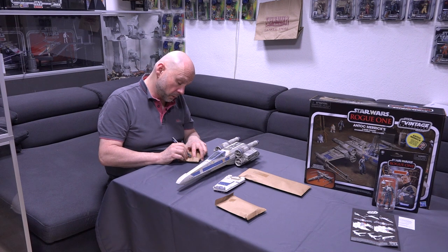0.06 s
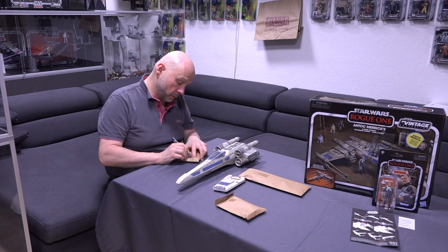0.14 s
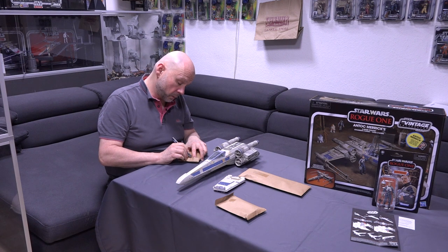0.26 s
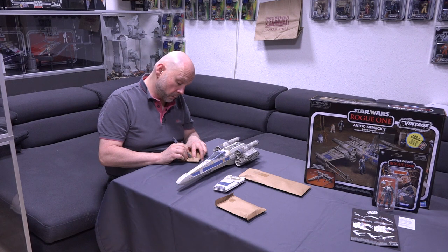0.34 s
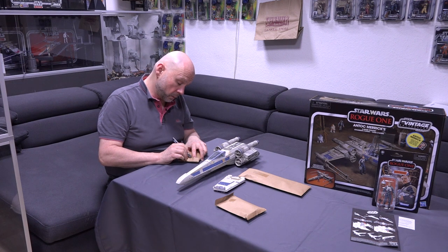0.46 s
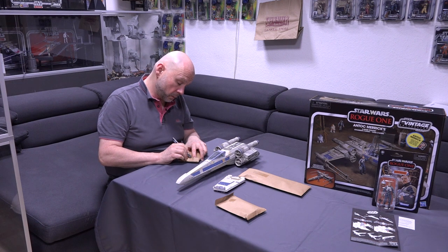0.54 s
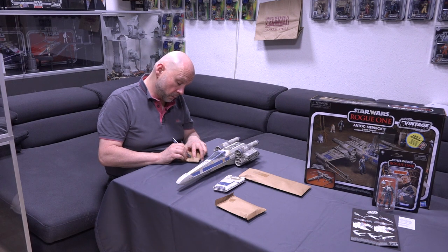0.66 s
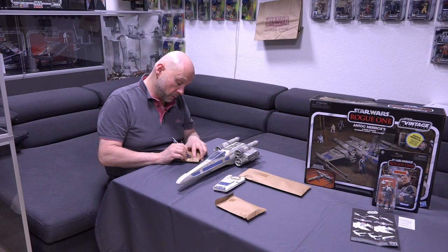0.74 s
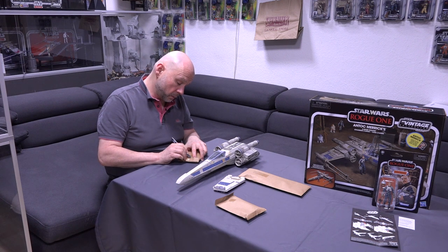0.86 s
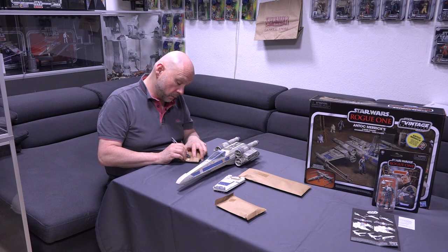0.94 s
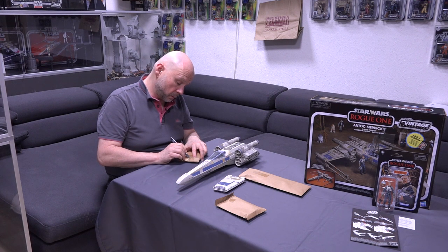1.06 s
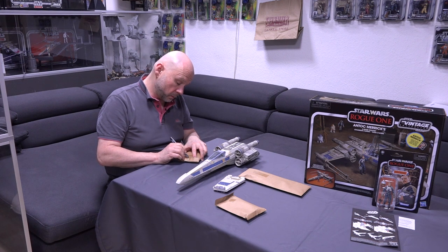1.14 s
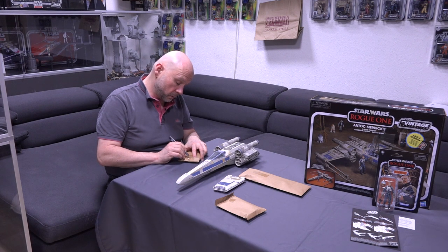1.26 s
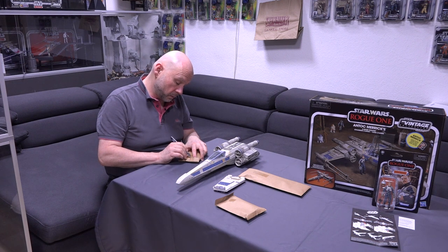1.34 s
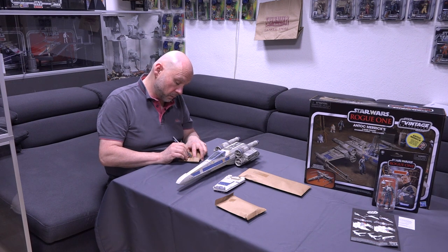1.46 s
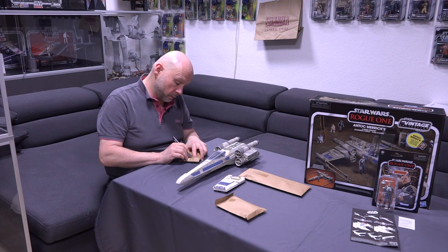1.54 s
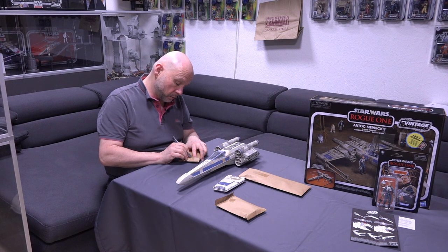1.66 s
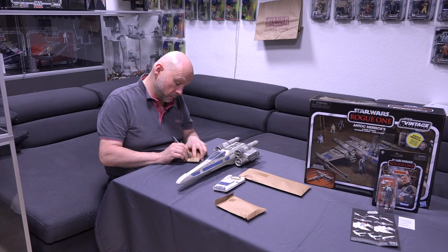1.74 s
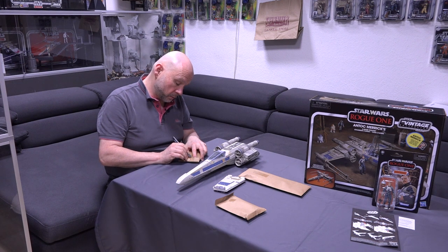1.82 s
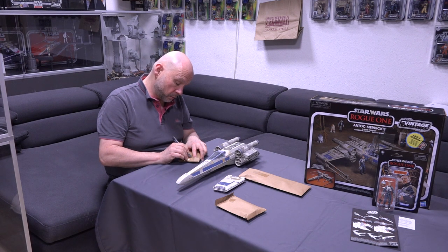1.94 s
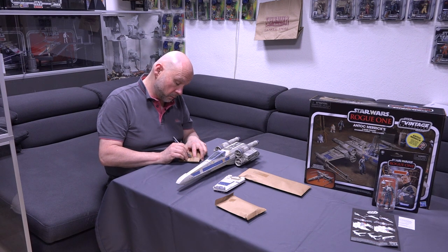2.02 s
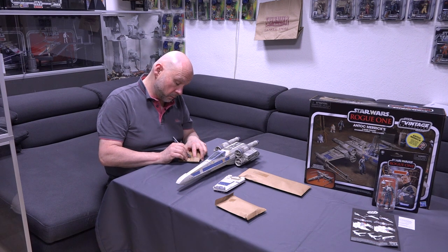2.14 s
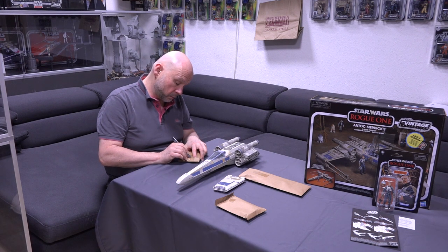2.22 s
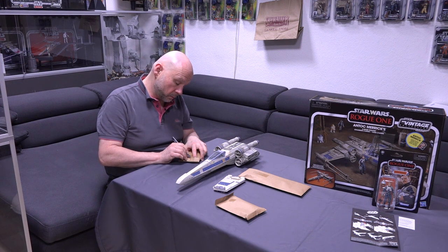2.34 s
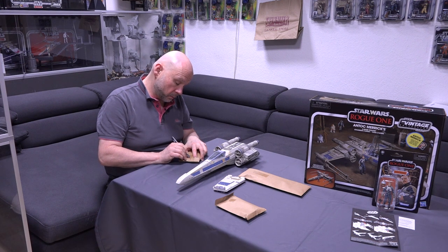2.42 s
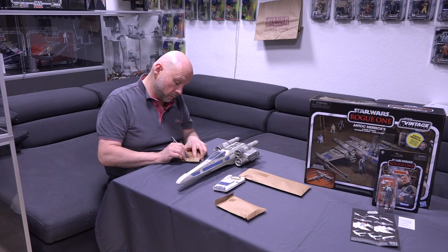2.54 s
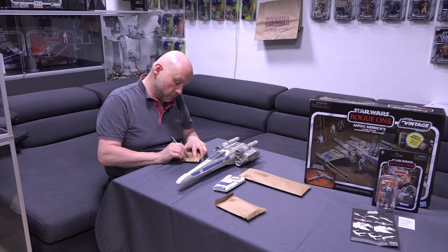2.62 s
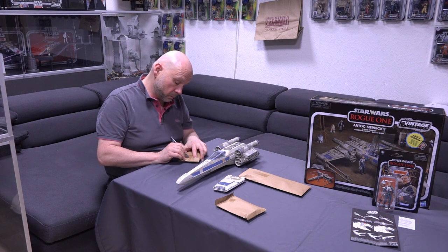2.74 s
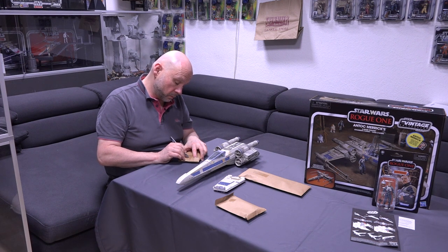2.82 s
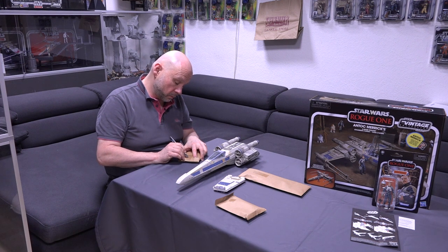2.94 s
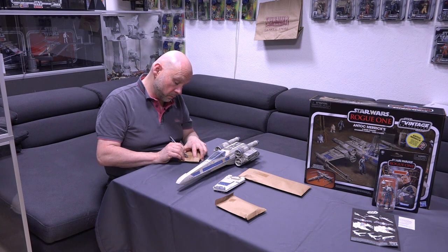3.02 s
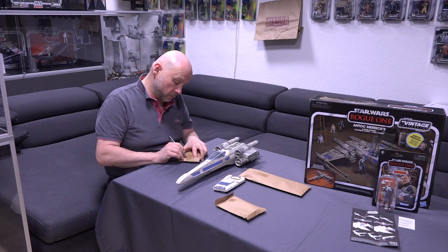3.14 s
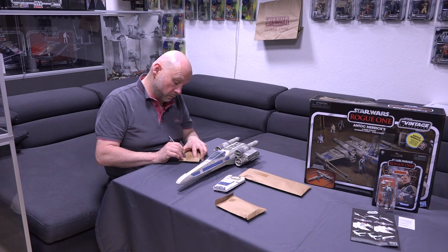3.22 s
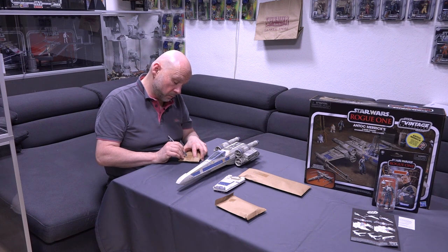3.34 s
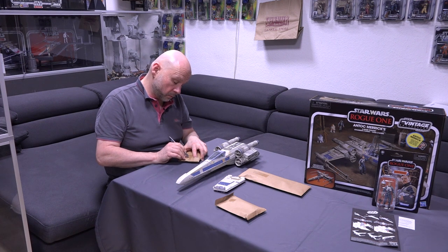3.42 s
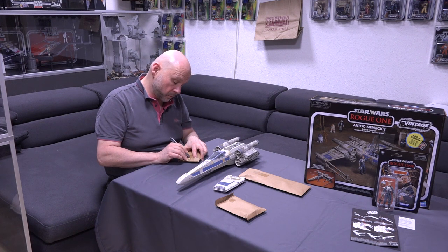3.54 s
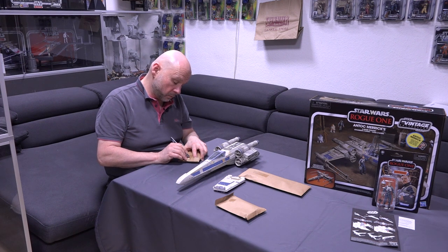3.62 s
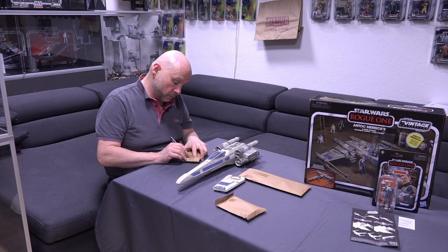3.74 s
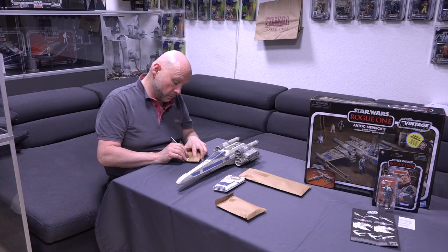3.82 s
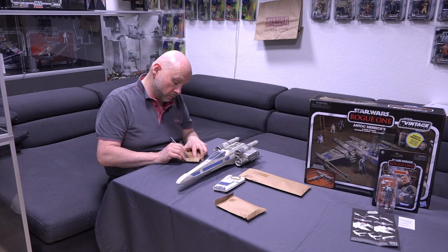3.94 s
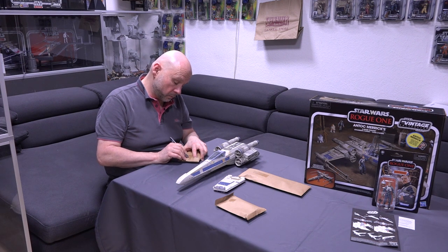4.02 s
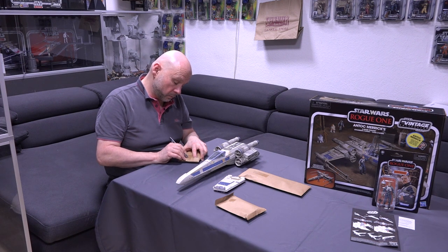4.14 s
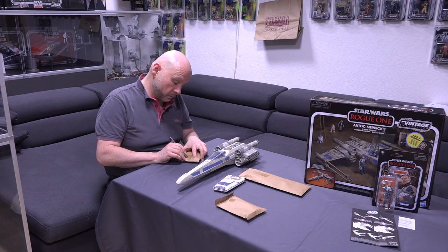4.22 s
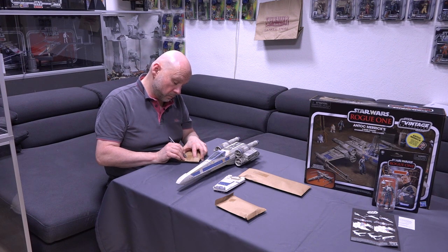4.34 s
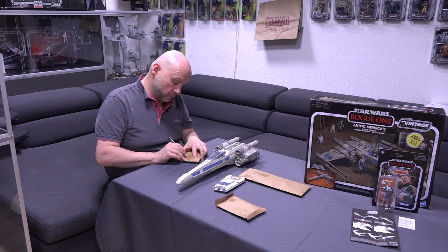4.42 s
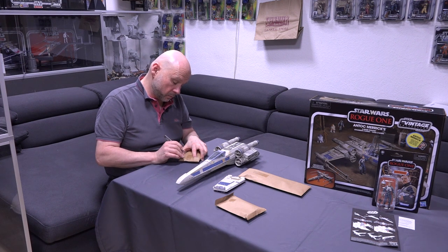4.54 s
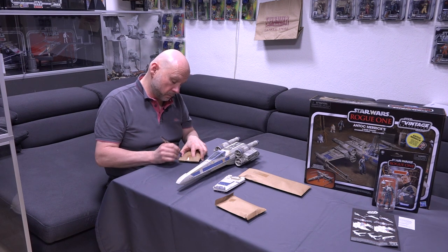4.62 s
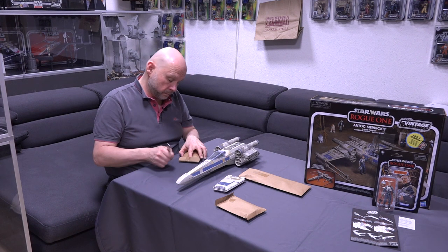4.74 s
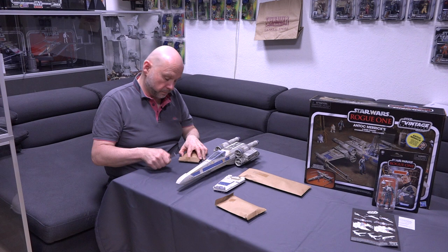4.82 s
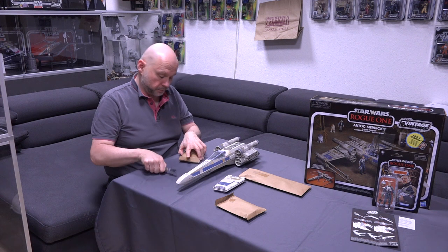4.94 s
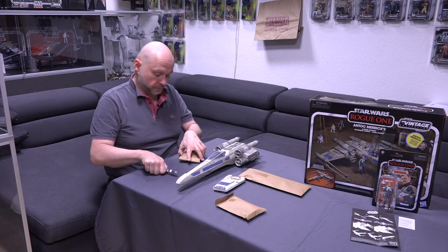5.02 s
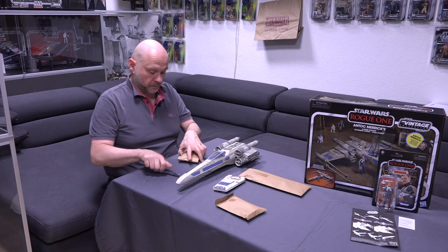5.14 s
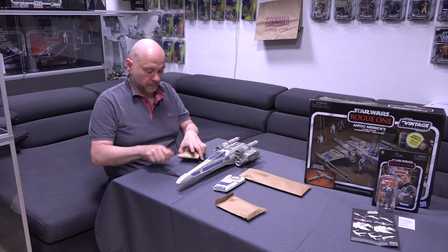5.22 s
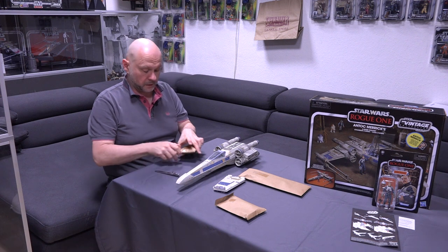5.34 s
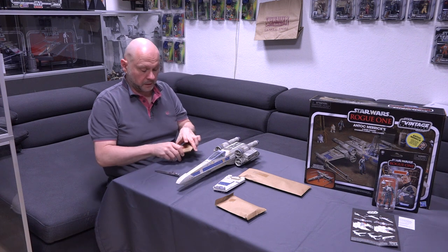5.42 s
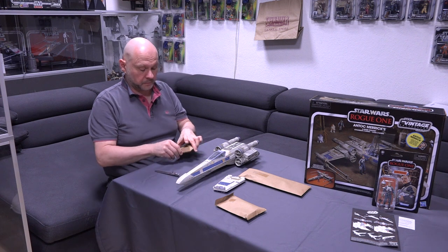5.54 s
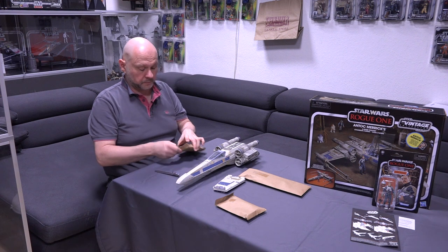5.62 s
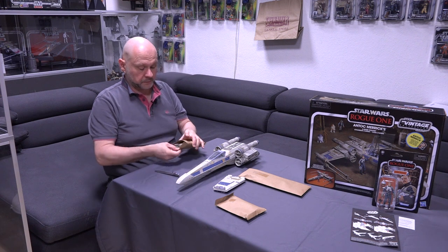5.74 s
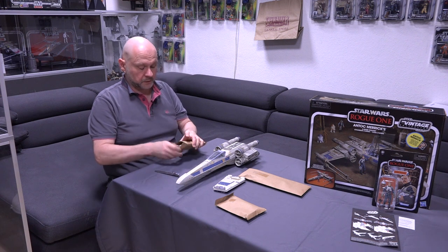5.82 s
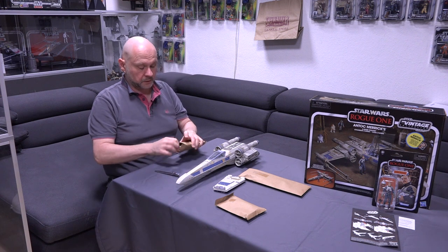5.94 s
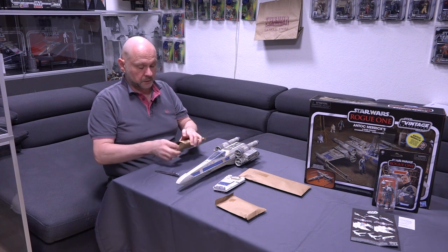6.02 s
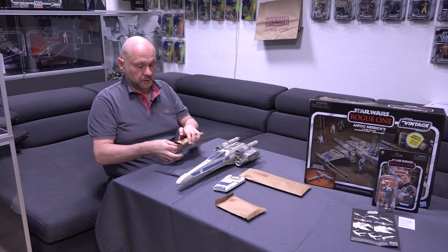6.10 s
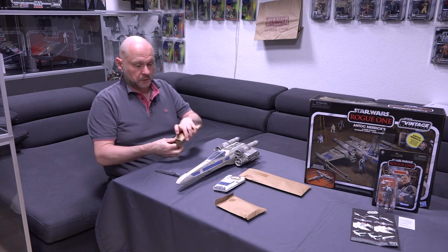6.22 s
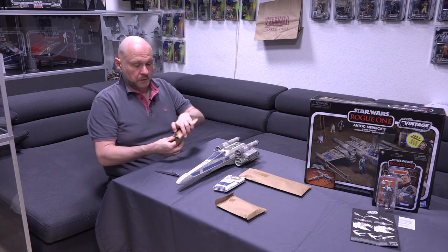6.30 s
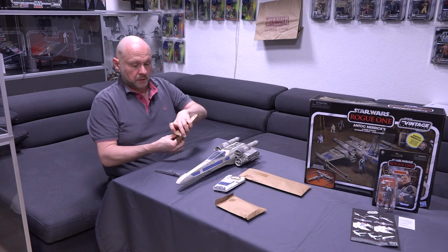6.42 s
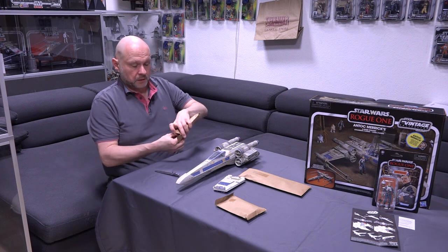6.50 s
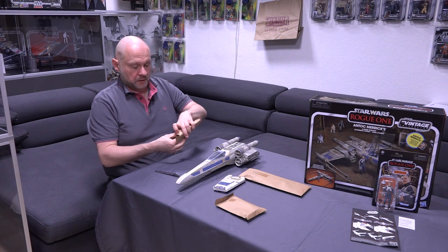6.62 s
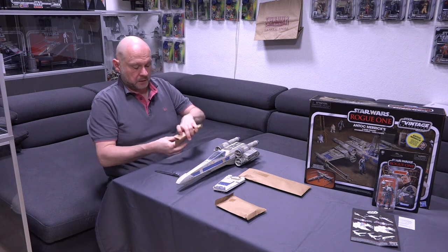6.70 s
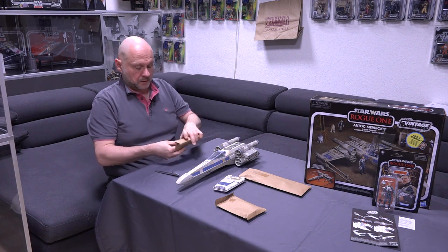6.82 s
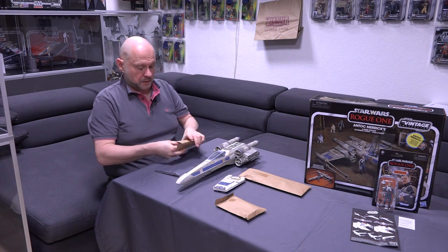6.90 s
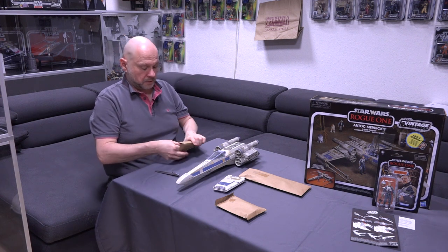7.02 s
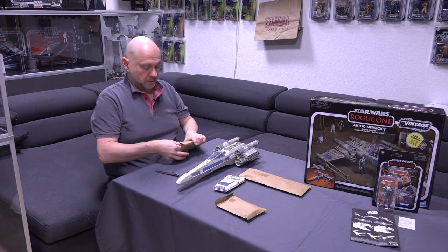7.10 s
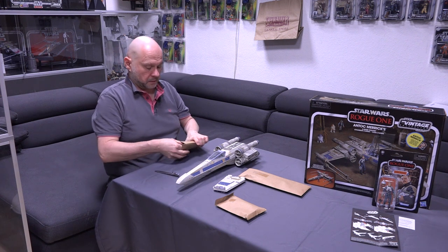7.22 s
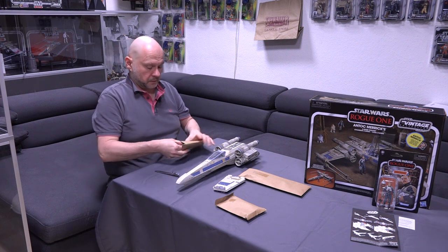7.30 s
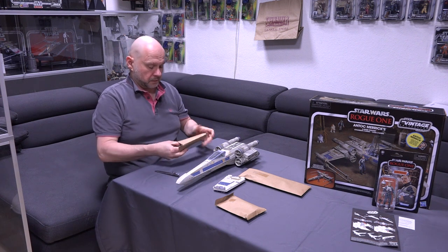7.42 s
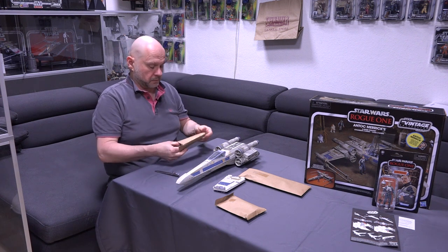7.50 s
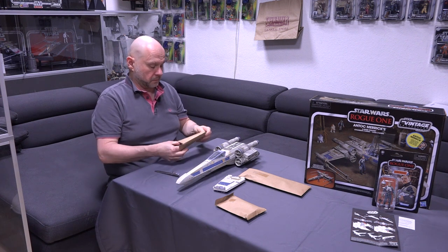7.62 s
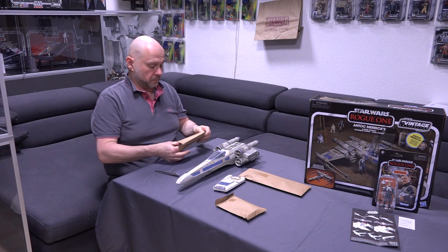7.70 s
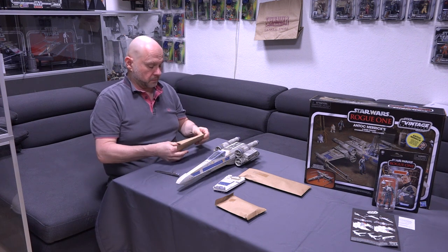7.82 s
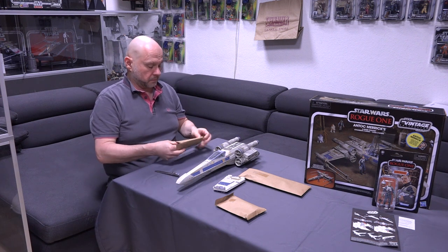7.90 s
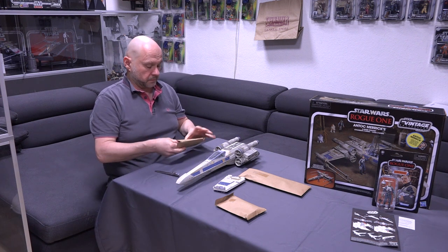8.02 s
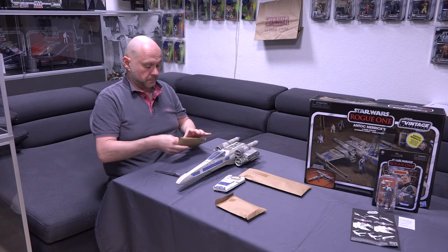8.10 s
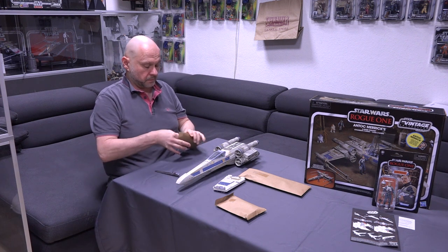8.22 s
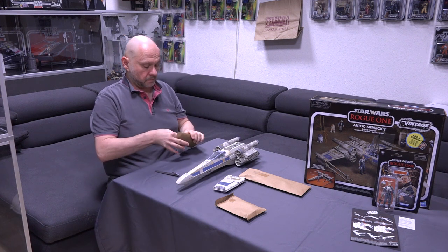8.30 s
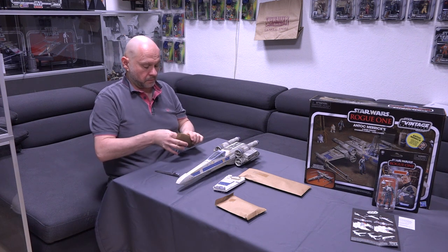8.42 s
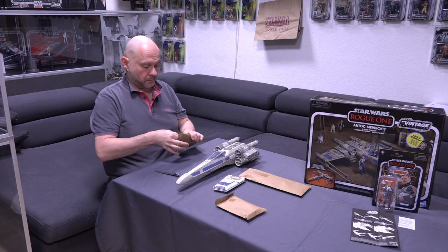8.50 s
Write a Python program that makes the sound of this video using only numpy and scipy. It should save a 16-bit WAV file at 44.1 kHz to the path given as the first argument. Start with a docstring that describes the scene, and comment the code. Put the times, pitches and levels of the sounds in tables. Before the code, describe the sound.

In a quiet furnished room with little echo, fingers faintly shift a small, stiff paper packet. From about 0.6 seconds a craft knife slits it in short, gritty strokes, tearing the fibres. In a pause near 1.9 seconds the paper gives a sharp snap together with a dull bump on the table. The cutting resumes at around 2.5 seconds with scattered small crackles and builds to two loud snaps just before 5 seconds. At about 5.2 seconds the knife is laid down with a light knock and a brief metallic chatter. From 5.4 seconds the hands pull the packet open in a dense rustle of skin on paper, full of sharp snaps, some with a faint dull pulse underneath. A harder table thump comes at about 8.3 seconds, and the rustling carries on to the end, just after 8.5 seconds.

```python
"""In a quiet furnished room, fingers shift a small stiff paper packet on a cloth-covered table.
From 0.6 s a craft knife slits it in short, gritty strokes: fibres tear and creases buckle with sharp
snaps, the loudest near 5 s. The knife is laid down and chatters to rest just after. Then the hands
pull the packet open in a dense rustle of skin on paper, full of snaps. Faint dull pulses lie under
some loud snaps; the table is bumped once during the cutting and harder near the end."""
import sys
import numpy as np
from scipy import signal
from scipy.fft import rfft, irfft
from scipy.io import wavfile
from scipy.ndimage import uniform_filter1d

SR = 44100
rng = np.random.default_rng(int(sys.argv[2]) if len(sys.argv) > 2 else 0)


def output_pcm(signal):
    """Save a mono or channel-first signal as 16-bit PCM at the path in sys.argv[1].

    Samples are clipped to [-1, 1] before scaling.
    """
    pcm = np.clip(np.atleast_2d(signal).T, -1, 1) * 32767
    wavfile.write(sys.argv[1], SR, np.round(pcm).astype(np.int16))


N = 377496
GRID_HZ = abs(np.fft.fftfreq(4096, 1 / SR))


def cuts(drag, treble):
    """The blade tears fibres, which ring the flat packet."""
    # resonances of the packet lying on the table: (frequency [Hz], width [Hz], level [dB])
    packet = [(1072, 113, 1), (1305, 470, -2), (1690, 210, 1), (2600, 350, -8.5), (3150, 600, -1.5),
              (4215, 800, -4), (6100, 390, -18), (7070, 960, -17), (9960, 3300, -14.5),
              (11200, 3700, -18.5)]
    fibres = grit(per_s=450, spread_db=1.6, slip_s=.0015, clump_db=2.6, clump_s=.008, hiss=.5)
    bass, middle, upper, top = bands(resonances(packet, valley_db=-25.5))
    body = np.hypot(np.hypot(middle, upper), gain_of(15) * bass)
    return colour(fibres * drag, body) + colour(fibres * treble, top)


def snaps(small_creases, snap_ms=1.476, crunch_ms=16, crunch_db=-19.5):
    """Each buckling crease rings the sheet with a burst of a few milliseconds, then a ragged crunch."""
    # creases: (time [s], level [dB], bass offset [dB], upper middle offset [dB], treble offset [dB])
    creases = [(.077, -44, -9, -18, -34), (.1, -38.5, -30, -15, -26), (.176, -44, -16, -11, -16),
               (.204, -27.5, -14.5, -14.5, -29), (.434, -46, -18, -11, -31), (.487, -37.5, -24, -12.5, -26),
               (.567, -43.5, -22, -28, -34), (1.027, -42.5, -22, 2, -7), (1.284, -38.5, -7, -43, -1.5),
               (1.373, -45, -11, -27, -32), (1.787, -25.5, -24, -21, -33), (1.889, -7, -23, -10, -20),
               (1.936, -26, -12, -44, -4), (2.095, -36.5, -40, -7, -14), (2.126, -27.5, -25, -12, -19),
               (2.187, -59.5, -30, 8, 1), (2.83, -45, -21, 10, -25), (3.124, -26.5, -10, -8.5, -22),
               (3.2, -22, -33, -9.5, -26), (3.31, -40, -6.5, -8, -4.5), (3.643, -35, -23, -31, -21),
               (3.688, -45, -14, -5, -9), (3.738, -23, -18.5, -11.5, -30), (3.91, -44.5, -22, -13, -27),
               (3.962, -19, -14, -9, -18), (4.121, -24, -12, -6, -20.5), (4.269, -42, -1.5, -21, -35),
               (4.412, -29, -11, -5, -18), (4.514, -28, -23, -9.5, -15), (4.528, -22, -7, -17, -25),
               (4.545, -46, -33, -25, 10.5), (4.712, -1.5, -22, -11, -21.5), (4.723, -23, -4, -2, -2),
               (4.806, -39.5, -24, -15, 6.5), (4.94, 0, -20.5, -5.5, -22), (5.037, -20, -11.5, -14, -16),
               (5.111, -40, -18, -7, -3), (5.397, -42, 0, -5, 6.5), (5.424, -27, 0, -17, -19),
               (5.453, -20.5, -12, -7.5, -17), (5.581, -28.5, -2.5, -17, -11),
               (5.697, -9.5, -12, -6.5, -26), (5.741, -2, -11.5, -2, -31), (5.774, -4.5, -16, -9, -55),
               (5.897, -19, -12, -7.5, -20), (6.1, -39, -11, -9, -30), (6.273, -6.5, -13.5, -8.5, -26),
               (6.323, -18, -9, -31, -36), (6.372, -21, -8, -27, -21), (6.398, -9.5, -13.5, -7, -11),
               (6.475, -25, -10, -6.5, -21), (6.526, -32.5, 5.5, -6, -26), (6.688, -16.5, -6.5, -9.5, -23),
               (6.792, -8.5, -17.5, -10.5, -33), (6.832, 0, -23, -16, -38), (6.893, -1.5, -19, -6, -30.5),
               (6.902, -12.5, -41, -1.5, -38), (7.047, -27.5, -35, -7, -4), (7.11, -18.5, -14, -16, -23),
               (7.134, -13, -13.5, -6.5, -24), (7.149, -18.5, -13, -9.5, -37), (7.263, -27, -5.5, -12, -52),
               (7.508, -0.5, -15.5, -11.5, -38), (7.651, -23, -32, -20, -37), (7.862, -12, -12.5, 2, -21.5),
               (7.996, -10, -15.5, -11, -29), (8.156, -30.5, -5, -14.5, -25.5),
               (8.245, -7.5, -16.5, -12.5, -38), (8.282, -6, -9, 2, -14.5)]
    # tone of the snapping sheet: (frequency [Hz], level [dB])
    tone = [(60, -33.5), (100, -7.5), (180, -4), (330, 0), (630, 0), (1130, 13.5), (1500, 5.5),
            (2100, -8.5), (3100, -8), (4400, -16.5), (5900, -21.5), (8800, -22.5), (12500, -27),
            (16000, -35.5)]
    s, db, bass_db, upper_db, top_db = np.r_[creases, small_creases].T[:, :, None]
    age = np.arange(1800) / SR / (snap_ms / 1000)  # in units of the snap's rise time
    noise, ragged = rng.standard_normal((len(s), 2, len(age))).transpose(1, 0, 2)
    ragged = np.maximum(evened(uniform_filter1d(ragged, size=60, axis=1)), 0)
    ragged *= np.hanning(2 * len(age))[len(age):]
    crunch = gain_of(crunch_db) * (age > 2) * ragged * np.exp(-age * snap_ms / crunch_ms)
    bursts = (age * np.exp(-age) + crunch) * noise
    out = np.zeros(N + SR)
    for band_db, gain in zip([bass_db, -6.0, upper_db, top_db], bands(gain_of(read(tone, GRID_HZ)))):
        rings = signal.fftconvolve(bursts, taps_of(gain)[None], axes=1)
        rings /= np.linalg.norm(rings, axis=1, keepdims=True)
        rings *= gain_of(db + band_db) * np.sqrt(snap_ms * SR / 1000)
        for start, ring in zip(np.round(s[:, 0] * SR).astype(int), rings):
            out[start:start + len(ring)] += ring
    return out[:N]


def crackle(motion, count=50, above_db=12, spread_db=5):
    """Rows for snaps(): small creases give way at random, louder the harder the paper is worked."""
    s = rng.uniform(0, N / SR, count)
    db = 20 * np.log10(motion[(s * SR).astype(int)] + 1e-9) + above_db
    levels = np.c_[db, np.tile([-13, -8, -20], (count, 1))]
    return np.c_[s, levels + spread_db * rng.uniform(-1, 1, (count, 4))]


def rustle(rub, treble):
    """Skin rubs on paper: dense grit whose treble share changes with the grip."""
    # tone of rubbed paper: (frequency [Hz], level [dB])
    tone = [(59, -15), (100, -14), (215, -13.5), (513, -12), (583, -11), (1010, -3), (1230, -1.5),
            (1480, -7), (2270, -3.5), (3320, -5.5), (4290, -12), (12400, -19), (16000, -32.5)]
    fibres = grit(per_s=400, spread_db=2.5, slip_s=.001, clump_db=1.6, clump_s=.015, hiss=1.5)
    fibres = bending(fibres, patchy_db=3.5)
    bass, middle, upper, top = bands(gain_of(read(tone, GRID_HZ)))
    low = gain_of(-6) * colour(fibres * rub, bass)
    return low + colour(fibres * rub, np.hypot(middle, upper)) + colour(fibres * treble, top)


def bending(x, patchy_db):
    """As the sheet changes shape its resonances wander: random patches over time and frequency."""
    hz, _, spectrum = signal.stft(x, SR, nperseg=512)
    depth_db = patchy_db / (1 + (hz[:, None] / 4500) ** 2)  # the treble stays an even hiss
    patches = rng.standard_normal(spectrum.shape[::-1]).T
    for _ in range(2):
        patches = uniform_filter1d(uniform_filter1d(patches, size=5, axis=0), size=9, axis=1)
    return evened(signal.istft(spectrum * gain_of(depth_db * evened(patches)), nperseg=512)[1][:N])


def knife(lands_s=5.172, chatter_s=.1, sag_db_per_s=107.5, fall_db_per_s=500):
    """The handle knocks the table top, then the blade chatters to rest and keeps it ringing."""
    # resonances of the steel blade: (frequency [Hz], width [Hz], level [dB])
    steel = [(3900, 1550, 11), (4770, 390, 10.5), (6900, 650, 4.5), (8580, 2400, 10), (11100, 640, 1),
             (11800, 3800, 9), (14200, 900, -16.5)]
    # resonances of the table top: (frequency [Hz], width [Hz], level [dB])
    table_top = [(470, 40, -2), (523, 40, -7), (646, 35, 0), (732, 45, -3), (892, 45, -5), (1190, 90, -11)]
    t = np.arange(N) / SR - lands_s
    decay_db = sag_db_per_s * t + fall_db_per_s * np.maximum(t - chatter_s, 0)
    chatter = (t > 0) * gain_of(-33.5 - np.maximum(decay_db, 0))
    ticks = chatter * grit(per_s=700, spread_db=2.5, slip_s=.001, clump_db=1.6, clump_s=.005, hiss=.7)
    blows = gain_of(-7) * ticks
    blows[round(lands_s * SR):][:40] += gain_of(-34) * np.hanning(40)  # the handle's knock
    blade = np.hypot(*bands(resonances(steel, valley_db=-23.0))[2:])  # upper middle and treble only
    return colour(blows, resonances(table_top, valley_db=-26)) + colour(ticks, blade)


def thumps():
    """Two clear bumps on the table, and faint dull pulses under loud snaps and the knife's landing."""
    # low thumps: (time [s], level [dB])
    pulses = [(1.889, -21), (4.712, -40), (4.94, -40), (5.178, -39), (5.74, -40), (6.397, -46),
              (6.889, -35), (7.509, -35), (7.86, -45), (8.283, -11)]
    t, out = np.arange(SR // 5) / SR, np.zeros(N + SR)
    turns = .58 * np.log(1 + t / .004)  # the swing slows as it dies
    swing = -np.sin(2 * np.pi * turns) * np.exp(-t / .012)
    for s, db in pulses:
        out[round((s + .0025) * SR):][:len(t)] += gain_of(db) * swing
    return out[:N]


def room(x, tail_db):
    """Early echoes and a sparse tail that dies faster in the treble; the furnishings colour both."""
    # reverb decay: (frequency [Hz], time to fall 60 dB [s])
    decay = [(150, .3), (1000, .29), (3000, .25), (8000, .19), (15000, .14)]
    # echoes off the table, the wall behind and the ceiling: (delay [s], level [dB])
    echoes = [(.0024, -35), (.0088, -10.5), (0.0106, -11.5), (0.023, -20.5)]
    # tone of what the room sends back: (frequency [Hz], level [dB])
    tone = [(100, -7), (500, -9), (1100, -10.5), (2000, -10.5), (4000, -10), (8000, -4.5), (16000, -19.5)]
    taps = np.zeros(SR // 2)
    slots = np.arange(300, len(taps) - 20, 20)
    taps[slots + rng.integers(0, 20, len(slots))] = rng.choice([-1., 1.], len(slots))
    hz, t, spectrum = signal.stft(taps, SR, nperseg=256)
    tail = signal.istft(spectrum * gain_of(-60 * t / read(decay, hz)[:, None]), SR, nperseg=256)[1]
    tail *= gain_of(tail_db) / np.linalg.norm(tail)
    for s, db in echoes:
        tail[round(s * SR)] += gain_of(db)
    walls = gain_of(read(tone, GRID_HZ))
    return x + colour(signal.oaconvolve(x, tail), walls) * np.sqrt(np.mean(walls ** 2))


def hush(level_db=-65, swell_db=1.0):
    """Room tone and the microphone's own noise, swelling a little."""
    # noise floor: (frequency [Hz], level [dB])
    tone = [(12, -39), (20, -11.5), (101, -4.5), (134, -3.5), (255, -10), (293, -6.5), (357, -10.5),
            (624, -14), (678, -15), (738, -17), (1290, -15.5), (1910, -27.5), (3160, -27), (12100, -42.5),
            (16000, -64.5)]
    swell = wander(6000)
    noise = irfft(rfft(rng.standard_normal(N)) * gain_of(read(tone, np.fft.rfftfreq(N, 1 / SR))), N)
    return gain_of(level_db + swell_db * swell) * evened(noise)


def grit(per_s, spread_db, slip_s, clump_db, clump_s, hiss):
    """Friction texture: short slips of noise, in clumps, over a fine hiss."""
    sizes = gain_of(spread_db * np.minimum(rng.exponential(1, N), 3))
    onsets = rng.random(N) < per_s / SR
    slips = signal.lfilter([1], [1, -np.exp(-1 / (slip_s * SR))], sizes * onsets)
    clumps = gain_of(clump_db * np.clip(wander(round(clump_s * SR)), -2, 2))
    return evened((evened(slips) + hiss) * rng.standard_normal(N) * clumps)


def strokes(rows, rise_db_per_s, fall_db_per_s, treble_fall=1.54):
    """Body and treble envelopes of strokes that swell, hold and die away, the treble first."""
    t, out = np.arange(0, N + 64, 64) / SR, 0
    for s, held, db, top_db in rows:
        swell_db = db - rise_db_per_s * np.maximum(s - t, 0)
        fall_db = fall_db_per_s * np.maximum(t - s - held, 0)
        out = out + gain_of([swell_db - fall_db, swell_db + top_db - treble_fall * fall_db])
    return [np.interp(np.arange(N) / SR, t, gain) for gain in out]


def wander(width):
    """Random drift of unit RMS, smoothed over width samples."""
    return evened(uniform_filter1d(uniform_filter1d(rng.standard_normal(N), width), width))


def resonances(peaks, valley_db):
    """Gain over frequency of a set of peaks above a flat valley."""
    power = sum(gain_of(2 * db) / (1 + (2 * (GRID_HZ - hz) / width) ** 2) ** 2
                for hz, width, db in peaks)
    return np.sqrt(power + gain_of(2 * valley_db))


def bands(gain, crossovers_hz=(650, 2000, 5500)):
    """Splits a gain into bass, middle, upper middle and treble."""
    below = [1 / (1 + (GRID_HZ / hz) ** 8) for hz in crossovers_hz]
    return gain * np.sqrt(abs(np.diff([0 * gain, *below, 1 + 0 * gain], axis=0)))


def taps_of(gain):
    """Causal filter of unit energy, shaped like the given gain over frequency."""
    log_gain = np.log(gain / gain.max() + 1e-5)
    taps = np.fft.ifft(np.exp(log_gain - 1j * signal.hilbert(log_gain).imag)).real[:2048]
    return taps / np.linalg.norm(taps)


def colour(x, gain):
    return signal.oaconvolve(x, taps_of(gain))[:N]


def read(points, hz):
    """A curve's value at hz, on a log frequency axis."""
    points_hz, value = np.transpose(points)
    return np.interp(np.log(hz + 1), np.log(points_hz + 1), value)


def evened(x):
    return x / np.sqrt(np.mean(x ** 2) + 1e-20)


def gain_of(db):
    return 10 ** (np.asarray(db) / 20)


def scene():
    """Paper and knife sound in the room, over dry thumps and the noise floor."""
    # pulls of the blade: (time at full drag [s], hold [s], level [dB], treble offset [dB])
    pulls = [(.6, 0.0076, -63, -28), (.645, 0.13, -55, -18), (.795, 0.031, -59, -18),
             (.86, 0.068, -46.5, -13), (.99, 0.036, -54, -7), (1.065, 0.034, -43, -9),
             (2.475, 0.027, -41, -17.5), (2.56, .23, -61, -15), (2.825, 0.004, -47.5, 2),
             (2.91, 0.096, -45, -12), (3.05, 0.098, -51.5, -11), (3.205, 0.087, -52, -19),
             (3.59, .11, -59.5, -15), (3.745, 0.059, -65, -9), (3.965, 0.045, -57.5, -17),
             (4.125, 0.052, -50.5, -10), (4.3, 0.045, -38, -12.5), (4.525, 0.021, -49.5, -28),
             (4.64, 0.17, -43.5, -14)]
    # finger slides: (time at full rub [s], hold [s], level [dB], treble offset [dB])
    slides = [(.01, 0.016, -69, -25), (.1, .03, -72, -14), (.22, 0.07, -68.5, -14), (.42, 0.043, -77, -20),
              (4.73, 0.36, -44, -9.5), (4.955, 0.086, -40.5, -13), (5.1, 0.056, -50, -8),
              (5.2, .21, -53, -14), (5.462, 0.039, -36.5, -5.5), (5.565, 0.036, -45, -5),
              (5.63, 0.017, -47.5, -10), (5.71, 0.043, -35, -9), (5.82, 0.055, -44, -11),
              (5.915, 0.028, -44, -5), (6, 0.038, -49, -5.5), (6.09, 0.09, -49, -18),
              (6.165, .21, -40.5, -7.5), (6.4, .14, -44.5, -2), (6.638, 0.33, -43, -5.5),
              (7.04, 0.13, -41.5, -8), (7.285, 0.032, -42.5, -6), (7.41, 0.029, -53.5, -13),
              (7.52, 0.023, -43, -14), (7.585, 0.11, -43.5, -9.5), (7.77, 0.042, -42, -14.5),
              (7.89, 0.085, -42, -10.5), (8.04, 0.22, -60.5, -12), (8.17, 0.016, -54, -17),
              (8.24, 0.15, -40.5, -6), (8.49, 0.047, -42, -7)]
    drag, drag_treble = strokes(pulls, rise_db_per_s=696, fall_db_per_s=361)
    rub, rub_treble = strokes(slides, rise_db_per_s=796, fall_db_per_s=279)
    paper = snaps(crackle(drag + rub))
    paper += gain_of(-1.5) * (cuts(drag, drag_treble) + rustle(rub, rub_treble))
    tool = gain_of(8.5) * room(knife(), tail_db=-3.5)
    return (room(paper, tail_db=-6.0) + tool + thumps() + hush())[None]


def record(dry, full_scale=.8, edge_hz=15900):
    """The microphone stage rounds off the loudest snaps, then a low-pass trims the very top."""
    rounded = full_scale * np.tanh(dry / full_scale)
    low_pass = signal.firwin(511, edge_hz, window=("kaiser", 9), fs=SR)
    return signal.oaconvolve(rounded, low_pass[None], "same")


dry = scene()
out = record(dry)
output_pcm(out)
```